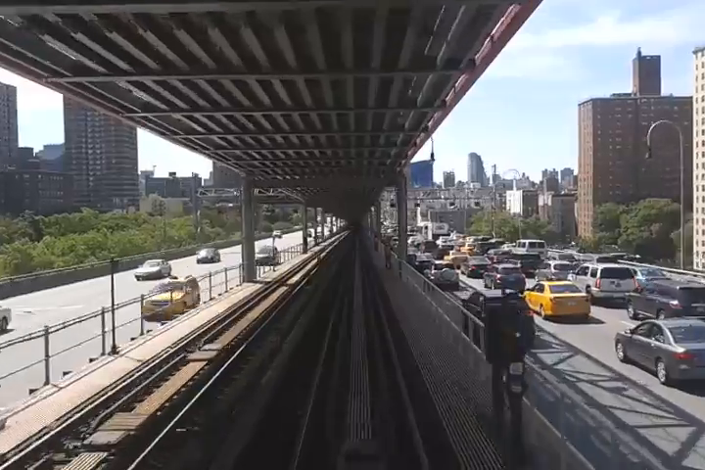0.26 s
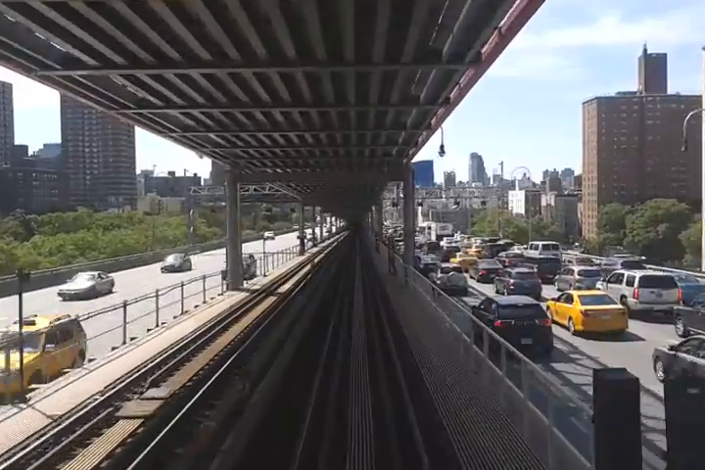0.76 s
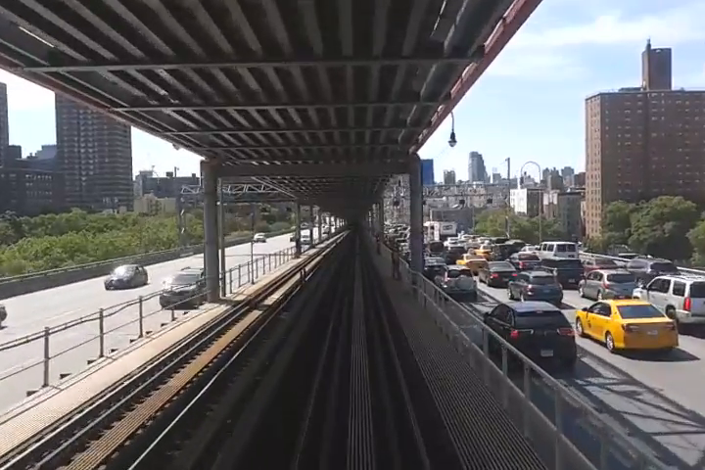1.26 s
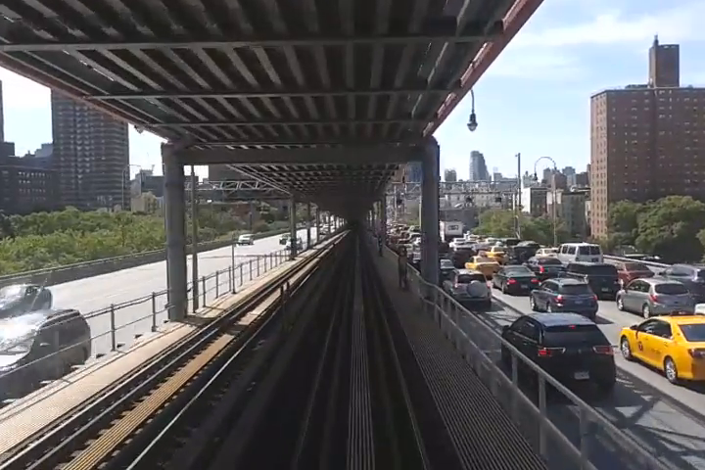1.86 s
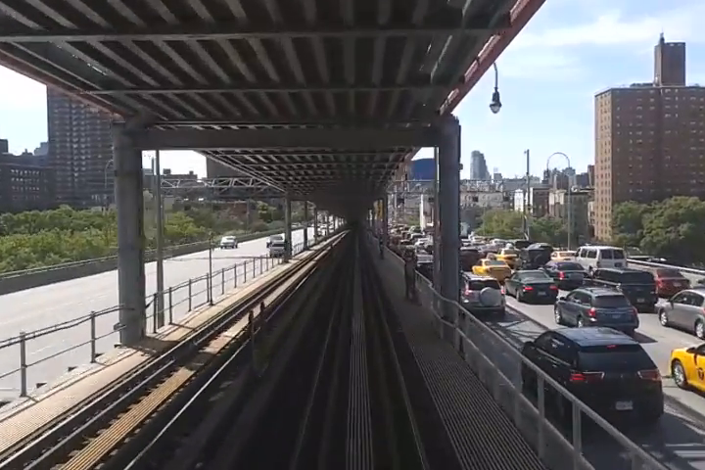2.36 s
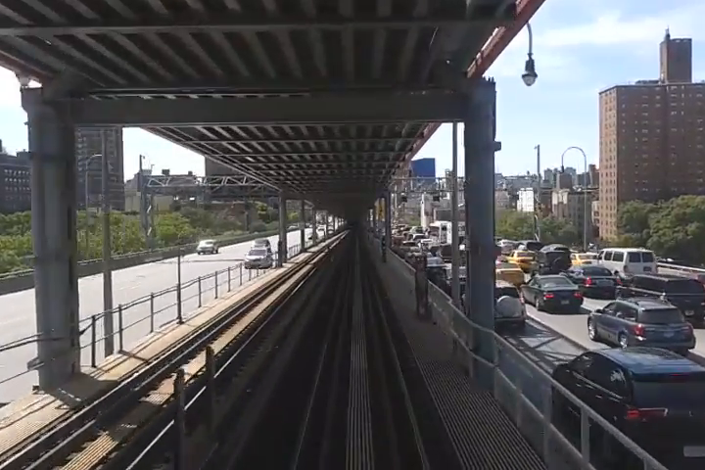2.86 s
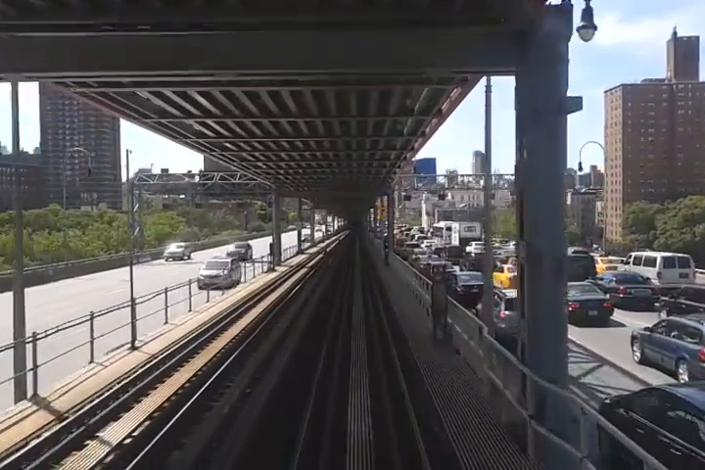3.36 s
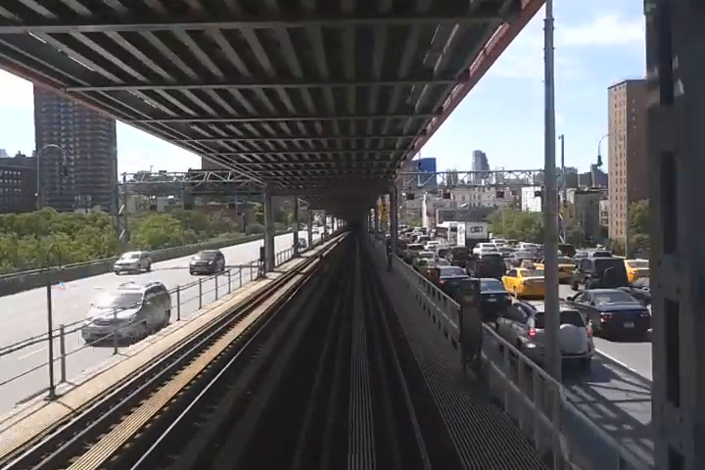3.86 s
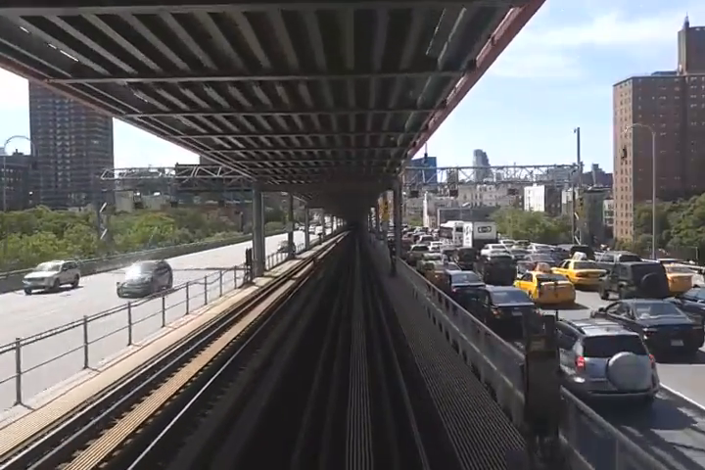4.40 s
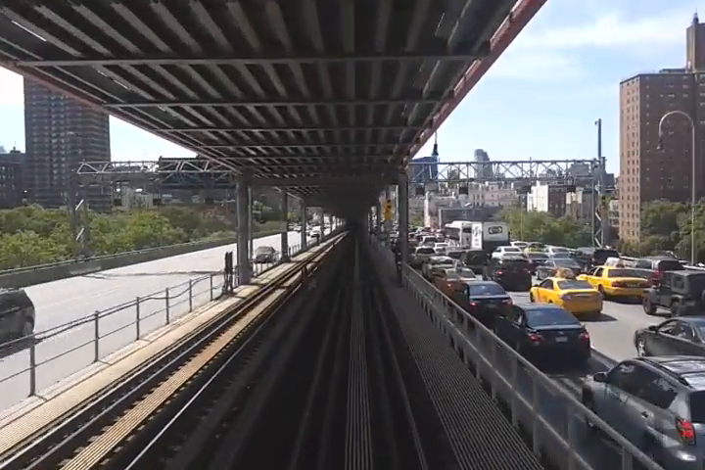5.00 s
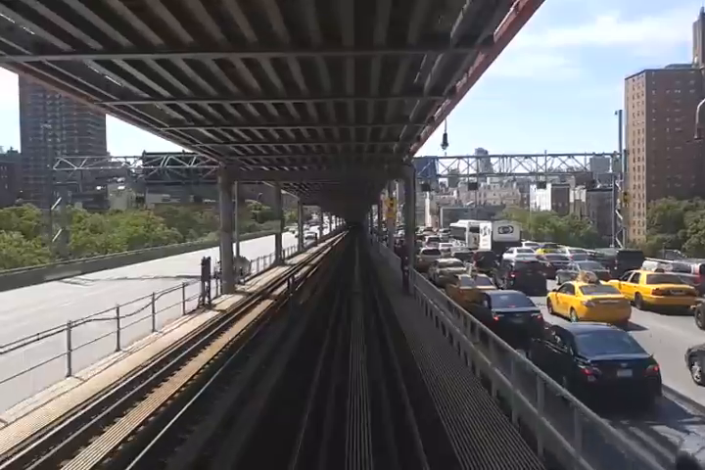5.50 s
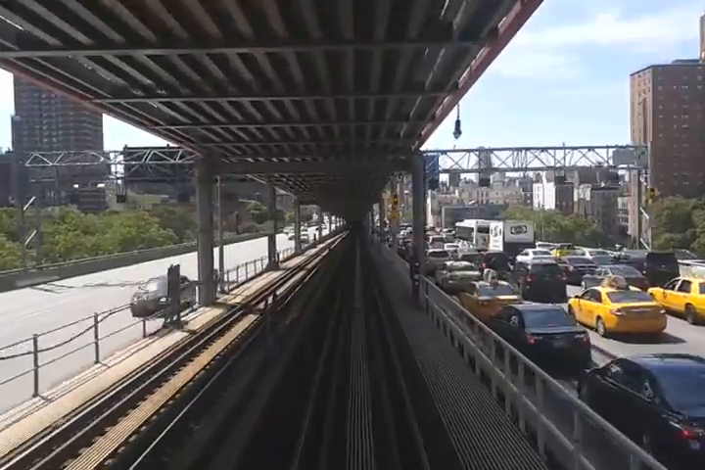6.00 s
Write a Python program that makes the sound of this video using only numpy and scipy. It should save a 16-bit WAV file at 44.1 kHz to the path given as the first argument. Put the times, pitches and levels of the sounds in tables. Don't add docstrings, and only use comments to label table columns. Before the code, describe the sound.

Continuous deep rumble at the front of a moving train, pulsing with girder hum, ringing wheels, dull rail thumps and one tiny latch tick.

```python
import sys
import numpy as np
from scipy import signal
from scipy.fft import rfft, irfft
from scipy.io import wavfile
from scipy.ndimage import uniform_filter1d

SR = 44100
rng = np.random.default_rng(int(sys.argv[2]) if len(sys.argv) > 2 else 0)


def invert_db(x):
    u = np.asarray(x, float) / 20
    return 10 ** u


def transcribe(u):
    v = np.clip(np.atleast_2d(u).T, -1, 1)
    q = np.round(v * 32767).astype(np.int16)
    wavfile.write(sys.argv[1], SR, q)


N = 275625


def level(x, db):
    return x * invert_db(db) / np.sqrt(np.mean(x ** 2))


def walk(rate_hz):
    hold = int(SR / rate_hz)
    steps = np.repeat(rng.standard_normal(N // hold + 1), hold)
    return 1.3 * uniform_filter1d(uniform_filter1d(steps, hold), hold)[:N]


def ring(x, hz, width_hz):
    once = signal.tf2sos(*signal.iirpeak(hz, hz / (1.55 * width_hz), fs=SR))
    return signal.sosfilt(np.vstack([once, once]), x)


def colour(x, points):
    hz, db = np.transpose(points)
    f = np.arange(N // 2 + 1) * SR / N + 1
    gain_db = np.interp(np.log(f), np.log(hz), db, left=-90, right=-90)
    return irfft(rfft(x) * invert_db(gain_db), N)


def shaken(modes, flicker_db, flicker_hz):
    total = np.zeros(N)
    for hz, width_hz, db in modes:
        mode = ring(rng.standard_normal(N), hz, width_hz)
        mode = level(mode, db + 10 * np.log10(width_hz))
        total += mode * invert_db(flicker_db * walk(flicker_hz))
    return level(total, 0)


def steady(x, hold_s, share):
    k = int(hold_s * SR)
    power = uniform_filter1d(uniform_filter1d(x ** 2, k), k)
    return level(x / power ** (share / 2), 0)


def structure(modes, flicker_db, flicker_hz, hold_s, share):
    return steady(shaken(modes, flicker_db, flicker_hz), hold_s, share)


def bursts(times_s, db, t60_s, rise_s):
    late_s = np.maximum(np.arange(N) / SR - np.asarray(times_s)[:, None], 0)
    attack = 1 - np.exp(-late_s / rise_s)
    decay = np.exp(-np.log(1000) * late_s / t60_s)
    return (invert_db(np.asarray(db))[:, None] * attack * decay).sum(axis=0)


def swells(times_s, db, length_s, size=128):
    coarse = np.arange(0, N + size, size)
    away = (coarse / SR - times_s[:, None]) / length_s[:, None]
    return np.interp(np.arange(N), coarse, db @ 2 ** (-4 * away ** 2))


# (frequency [Hz], density [dB per Hz])
HISS = [(2650, -27), (4500, -3.5), (5260, -2.5), (5660, -6), (6580, -5.5), (7150, -5), (9030, -2.5),
        (12000, -3), (15000, -2.5)]
# (frequency [Hz], level [dB rms])
TONES = [(1641, -56), (2929, -63.5), (3278, -80), (4221, -79), (5507, -81), (5744, -78.0), (5975, -85.5),
         (6325, -79.5), (6444, -86), (6562, -89), (6799, -80.5), (7499, -87), (8086, -85), (8441, -85),
         (8791, -81), (9141, -83), (9378, -83),
         (5391, -89), (5625, -90), (5859, -88), (6211, -92), (7852, -88), (8203, -90), (8320, -91),
               (8555, -93), (8672, -87), (9844, -94), (10078, -93)]
HISS_DB, CLOCK_HZ = -63, 15000 / 128


def camera():
    t = np.arange(N) / SR
    hiss = level(colour(rng.standard_normal(N), HISS), HISS_DB)
    tones = np.zeros(N)
    for hz, db in TONES:
        cycles = np.round(hz / CLOCK_HZ) * CLOCK_HZ * t + rng.random()
        tones += np.sqrt(2) * invert_db(db) * np.sin(2 * np.pi * cycles)
    return hiss + tones * invert_db(2.2 * walk(9) - 1.5)


# (frequency [Hz], density [dB per Hz])
RATTLE = [(1350, -22), (2300, -7), (2650, -4.5), (2830, -0.5), (3030, -1.5), (3070, -2.5), (4030, -3),
          (5500, -22.5), (7150, -47), (12100, -120)]
# (time [s], peak [dB], frequency [Hz], t60 [s])
TICKS = [
    (.159, -55, 4100, .12),
    (4.5136, -47, 4170, 0.06),
    (4.54, -58, 4250, .08),
    (4.826, -52, 3480, .05),
    (4.829, -56, 3900, .04),
]


def fittings(rattle_db):
    t = np.arange(N) / SR
    grains = rng.standard_normal(N) * invert_db(walk(60))
    out = level(colour(grains, RATTLE), 0) * invert_db(rattle_db)
    for s, db, hz, t60_s in TICKS:
        out += np.sin(2 * np.pi * hz * t) * bursts([s], [db], t60_s, rise_s=0.0008)
    return out


# (time [s], thud peak [dB], clank [dB])
JOINTS = [(0.159, -4, -68), (0.449, -6, -57), (1.095, -10, -56), (1.339, -7, -65), (1.959, -13, -57),
          (2.199, -5.5, -56), (3.399, -5, -61), (3.969, -27, -61), (4.829, -16, -59), (5.129, -8, -62),
          (5.399, -10, -60)]


def joints():
    s, thud_db, clank_db = np.transpose(JOINTS)
    body = shaken(DECK + PANELS, flicker_db=0, flicker_hz=9)
    steel = level(ring(rng.standard_normal(N), hz=2700, width_hz=2200), 0)
    thud = body * bursts(s, thud_db - 17, t60_s=0.15, rise_s=0.0033)
    return thud + steel * bursts(s, clank_db, t60_s=0.25, rise_s=0.006)


# (frequency [Hz], density [dB per Hz])
ROAR = [(20, -18), (28, -11), (42, -12), (95, -4), (125, 0), (271, -4), (326, -18.5), (500, -6.5),
        (800, -13), (936, -12), (1300, -12), (1600, -20), (2010, -32.5), (2470, -46)]
# (frequency [Hz], width [Hz], density [dB per Hz])
BOGIE = [(26, 11, -8), (55, 23, 2.5), (84, 22, -3)]
WHEELS = [(1056, 130, -6.5), (1181, 22, 0.5), (1198.3, 21.4, -0.5), (1289, 112, -3), (1377, 46, -10.5),
          (1466, 107, -9.5), (1560, 60, -21.5)]
PANELS = [(347.6, 43.6, -0.5), (379.7, 45, -1.5), (457.7, 38, 0), (576.6, 30, -3.5), (600.6, 18.7, -1.5),
          (682, 76, -3.5), (792, 69, -5)]
GIRDERS = [(253.3, 21.6, -2.5), (275.5, 11.5, 0), (291.2, 16.4, -2.5)]
DECK = [(137.8, 34.4, -2.5), (164.3, 32.7, -2), (193.4, 23.6, -0.5), (222, 23, -6.5)]
ROAR_DB, BOGIE_DB = -30, -38.5


def rolling(boom_db, girder_db, panel_db, wheel_db):
    load_db = 0.26 * (panel_db - panel_db.mean()) + 0.26 * (boom_db - boom_db.mean())
    roar = level(colour(rng.standard_normal(N), ROAR), ROAR_DB) * invert_db(load_db + 0.43 * walk(4.92))
    bogie = structure(BOGIE, flicker_db=1.5, flicker_hz=3.2, hold_s=0.11, share=0.67)
    wheels = structure(WHEELS, flicker_db=0.9, flicker_hz=2.96, hold_s=0.1, share=0.49)
    panels = structure(PANELS, flicker_db=1.67, flicker_hz=4.1, hold_s=0.17, share=0.38)
    girders = structure(GIRDERS, flicker_db=0.5, flicker_hz=5.4, hold_s=0.064, share=0.54)
    deck = structure(DECK, flicker_db=1.4, flicker_hz=2.87, hold_s=0.13, share=0.99)
    car = invert_db(BOGIE_DB) * bogie + invert_db(wheel_db) * wheels + invert_db(panel_db) * panels
    return roar + car + invert_db(girder_db) * girders + invert_db(boom_db) * deck


# (time [s], deck swell [dB], body swell [dB], length [s])
DIPS = [(.2, 3, 1, 0.13), (0.49, 7.5, 3, 0.19), (.64, 2.5, .5, .14), (0.857, 2.5, 2, 0.2),
        (1.119, 7, -0.5, 0.1), (1.39, 3.5, 2, 0.27), (1.596, 1.5, 0, .14), (1.98, 5.5, 4.5, 0.16),
        (2.238, 5.5, 2.5, .22), (2.577, 3, 2.5, 0.26), (2.89, 4.5, 1.5, 0.15), (3.04, 2, 0.5, 0.13),
        (3.284, 4, -1, 0.062), (3.426, 8, 1.5, 0.094), (3.683, 2.5, 3, 0.19), (3.98, 5.5, 1.5, 0.12),
        (4.08, 0.5, 2, .14), (4.245, 5.5, 1.5, 0.17), (4.49, 2.5, 2.5, 0.21), (4.883, 4, 3.5, 0.11),
        (5.11, 4.5, 3, 0.2), (5.4, 4.5, 2, .16), (5.703, 8, 2, 0.11), (5.895, 2.5, 0, .1)]
# (time [s], swell [dB], length [s])
SPANS = [(.09, 7, .1), (.27, 5, 0.086), (.46, 4.5, 0.15), (0.655, 7, .14), (0.815, 8, .1), (1.36, 5, 0.12),
         (1.53, 6.5, .12), (1.71, 7, 0.11), (1.98, 4.5, 0.13), (2.16, 5.5, 0.22), (2.524, 3, 0.17),
         (2.666, 0, 0.069), (2.927, 5.5, 0.37), (3.263, 3, 0.11), (3.7, 2.5, 0.22), (4.0, 6, 0.29),
         (4.37, 5, .16), (4.583, 4.5, 0.15), (4.81, 5.5, 0.12), (5.073, 5.5, 0.15), (5.237, 7.5, 0.11),
         (5.56, 4, 0.087), (5.697, 1.5, 0.11), (5.975, 9.5, 0.1), (6.24, 7.5, .1)]
# (time [s], swell [dB], length [s])
PATCHES = [(.24, 4, 0.15), (0.526, 4, .22), (.95, 2.5, .24), (1.36, 3, 0.22), (1.8, 4.5, .2),
           (2.0, 3.5, .1), (2.363, 3.5, 0.28), (2.65, 2.5, .14), (2.8, 4, 0.092), (3.0, 2, .16),
           (3.39, 3.5, .14), (3.59, 1.5, .08), (3.82, 1.5, 0.12), (3.99, 3, .16), (4.297, 4, 0.09),
           (4.52, 3, 0.17), (4.86, 2.5, 0.25), (5.25, 2, 0.15), (5.49, 3, 0.17), (5.64, 2.5, 0.11),
           (5.97, 1.5, 0.17), (6.18, 3.5, .12)]
# (time [s], swell [dB], length [s])
SHAKES = [
    (.0, 3, 0.083),
    (0.235, 4.5, 0.12),
    (.5, 2, .24),
]
DECK_DB, GIRDER_DB, PANEL_DB, WHEEL_DB, RATTLE_DB = -29.5, -35.5, -31.5, -36.5, -61.84
DECK_FADE_DB_PER_S = -0.21


def scene():
    s, deck_db, body_db, length_s = np.transpose(DIPS)
    body = swells(s, body_db, length_s)
    rail = swells(*np.transpose(PATCHES))
    boom_db = DECK_DB + DECK_FADE_DB_PER_S * np.arange(N) / SR + swells(s, deck_db, length_s)
    girder_db = GIRDER_DB + swells(*np.transpose(SPANS))
    wheel_db = WHEEL_DB + rail + 0.089 * body
    rattle_db = RATTLE_DB + 0.3 * body + 0.3 * rail + swells(*np.transpose(SHAKES))
    track = rolling(boom_db, girder_db, PANEL_DB + body, wheel_db)
    return (camera() + fittings(rattle_db) + joints() + track)[None, :]


# (frequency [Hz], step [dB])
STEP = [(3500, -68), (4700, -53.5), (5500, -52.8), (6200, -53.3), (7200, -52.3), (9000, -52),
        (14500, -51.5)]
TOP_HZ = 14540


def thin_treble(x, follow, patchy_db, dead, size=940, count=10):
    n, k = np.arange(2 * size), np.arange(size)[:, None] + 0.5
    window = np.sqrt(2 / size) * np.sin(np.pi * (n + 0.5) / (2 * size))
    basis = window * np.cos(np.pi / size * (n + 0.5 + size / 2) * k)
    at = np.arange(N // size + 2)[:, None] * size + n
    frames = np.pad(x, (size, 2 * size), mode="reflect")[at]
    hz = k[:, 0] * SR / (2 * size)
    loud_db = 10 * np.log10(uniform_filter1d(np.mean(frames ** 2, axis=1), size=3))
    patch = 2 * uniform_filter1d(rng.standard_normal((len(at), size // count)), size=4, axis=0)
    step_db = np.interp(hz, *np.transpose(STEP), left=-140) + patchy_db * np.repeat(patch, count, axis=1)
    step = invert_db(step_db + follow * (loud_db - loud_db.mean())[:, None])
    bins = frames @ basis.T
    bins = np.sign(bins) * np.floor(np.abs(bins) / step + 0.5 - dead) * step * (hz < TOP_HZ)
    out = np.zeros(at.max() + 1)
    np.add.at(out, at, bins @ basis)
    return out[size:size + N]


def top_cut(x):
    return signal.sosfilt(signal.butter(12, 15220, fs=SR, output="sos"), x)


def record(dry):
    mix = thin_treble(dry[0], follow=0.5, patchy_db=2.0, dead=0.096)[None, :]
    return top_cut(mix)


dry = scene()
out = record(dry)
transcribe(out)
```